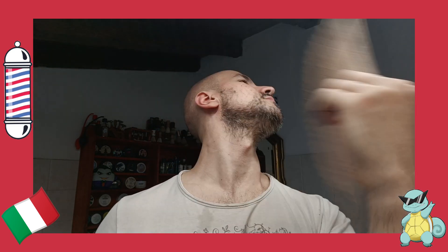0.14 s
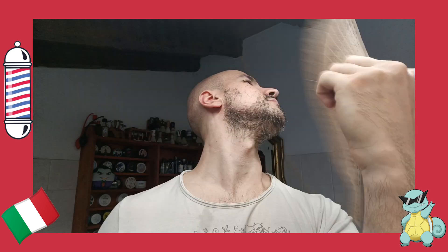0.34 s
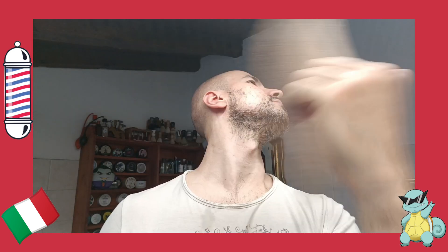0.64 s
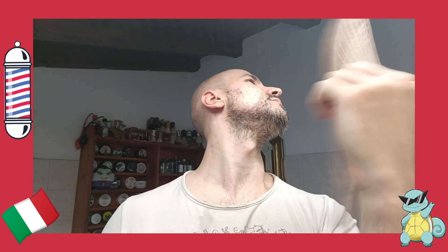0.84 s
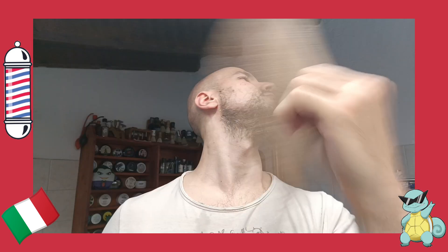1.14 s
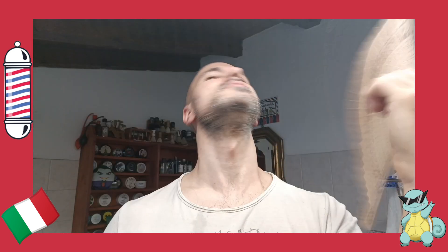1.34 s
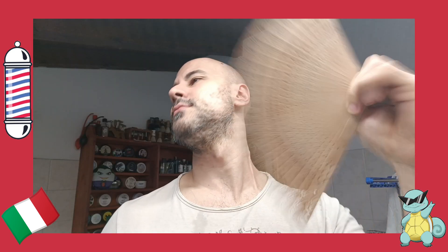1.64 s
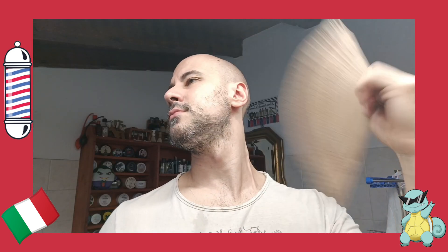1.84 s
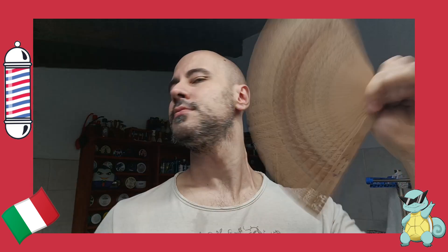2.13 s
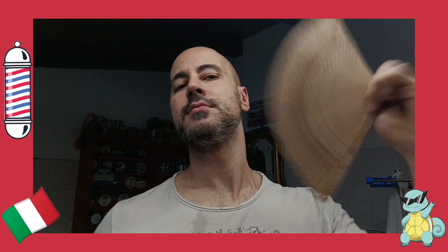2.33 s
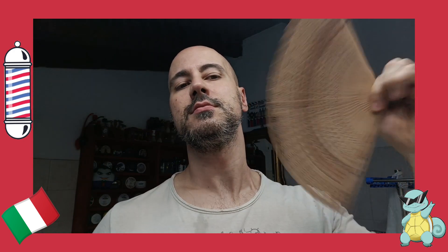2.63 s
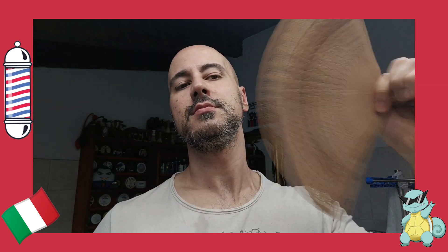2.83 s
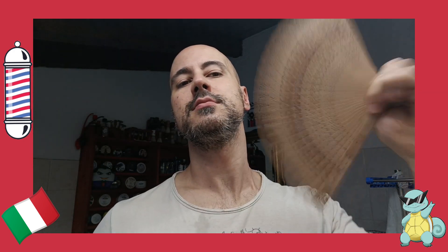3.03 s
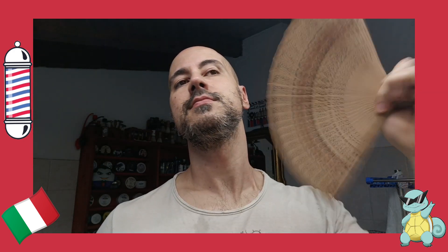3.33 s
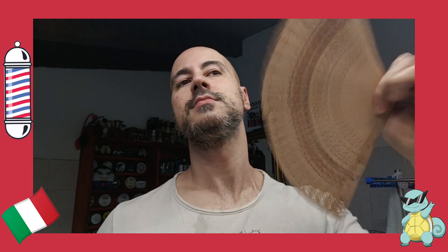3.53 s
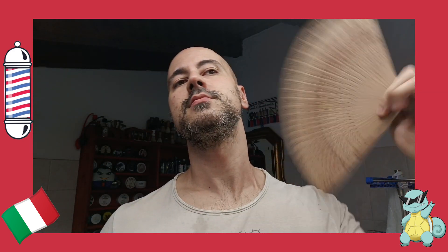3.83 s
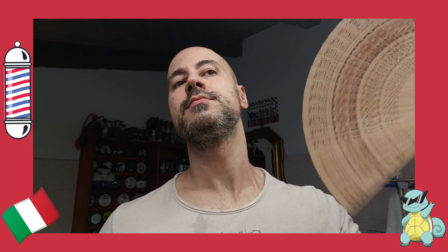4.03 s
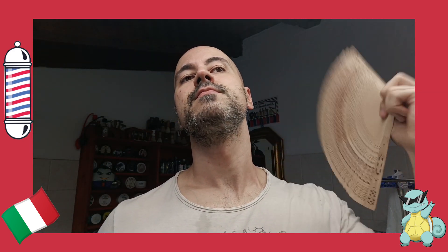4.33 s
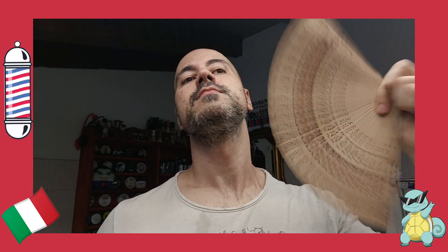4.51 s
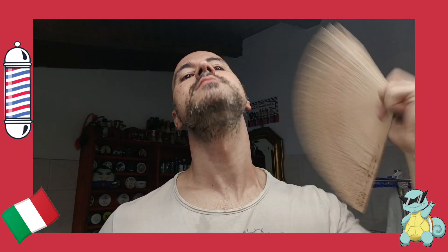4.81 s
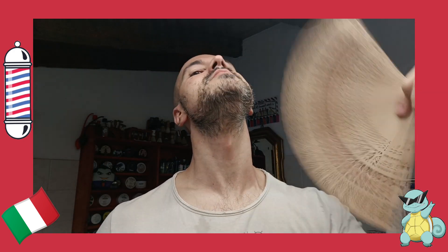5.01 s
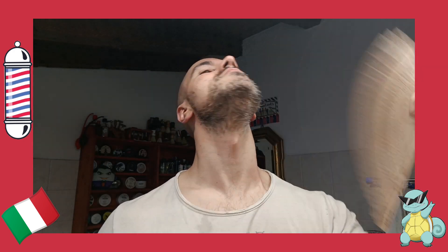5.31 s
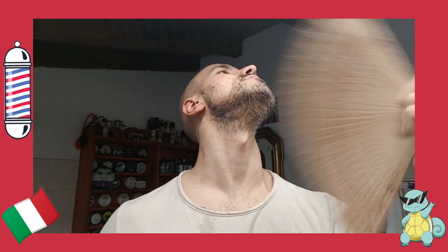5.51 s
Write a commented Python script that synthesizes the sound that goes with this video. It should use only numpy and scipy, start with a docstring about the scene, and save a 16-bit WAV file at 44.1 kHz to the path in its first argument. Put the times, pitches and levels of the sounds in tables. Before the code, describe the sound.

Close, dry wooden rattle-claps from a hand fan waved rapidly in a quiet room, with soft air thumps and one short rest.

```python
"""Wooden slats clap together about four times a second, then rustle on: a folding fan waved in a quiet room.
Softer rattles answer at each turn back; in one pause the slats creep and tick to rest.
The slat sounds are random knocks and rubbing ringing wood resonances, with a reverberant tail.
Strokes also thump and hum as moving air; a low tone swells once, over thin whistles, murmur and hiss."""
import sys
import numpy as np
from scipy import signal
from scipy.fft import rfft, irfft
from scipy.io import wavfile
from scipy.ndimage import uniform_filter1d

SR = 44100
rng = np.random.default_rng(int(sys.argv[2]) if len(sys.argv) > 2 else 0)


def put_to_file(sound):
    """Save the sound as 16-bit audio at rate SR, in the file named by the first command-line argument."""
    columns = np.atleast_2d(sound).T  # one column per channel
    safe = np.clip(columns, -1, 1)
    whole_steps = np.round(safe * 32767)
    wavfile.write(sys.argv[1], SR, whole_steps.astype(np.int16))


N = 249561
SIZE = 16384  # samples in one stroke's block of slat sound


def amp(db):
    """Turn decibels into an amplitude factor."""
    return 10 ** (np.asarray(db) / 20)


def evened(x):
    """Scale to an RMS of one."""
    return x / np.sqrt(np.mean(x ** 2) + 1e-20)


def read(points, hz):
    """Read a curve of (frequency, value) points along a logarithmic frequency axis."""
    f, value = np.transpose(points)
    return np.interp(np.log(hz + 1), np.log(f + 1), value)


def add(mix, s, sound):
    """Lay a sound into the mix at s seconds, cut at the end of the mix."""
    at = max(round(s * SR), 0)
    part = mix[:, at:at + sound.shape[-1]]
    part += sound[..., :part.shape[1]]


def fade(t, t60):
    """Exponential decay from time zero, falling 60 dB in t60 seconds; silent before."""
    return (t >= 0) * amp(-60 * np.maximum(t, 0) / t60)


def resonate(x, hz, width):
    """Two-pole resonance at hz with a bandwidth of width Hz."""
    r = np.exp(-np.pi * width / SR)
    return signal.lfilter([1 - r], [1, -2 * r * np.cos(2 * np.pi * hz / SR), r * r], x)


# A firm clap: level [dB], decay [s], rise [s]
FIRM_DB, FIRM_T60_S, FIRM_RISE_S = -17.5, 0.047, 0.011
# A weaker clap is looser: it lasts longer and builds more slowly (exponent per dB)
LOOSER_PER_DB, SLOWER_PER_DB = 0.0721, 0.02
# First touch just ahead of a firm clap: level [dB], and its dB change per dB of clap
AHEAD_DB, AHEAD_SHARE = -46.5, 0.64
# Rattle of the turn back: reference level [dB], decay [s], longer decay when weaker (exponent per dB)
BACK_DB, BACK_T60_S, BACK_LOOSER_PER_DB = -38.5, 0.12, 0.04
# After a clap under GENTLE_DB the slats part and start to fall quiet PARTED_S before the turn back
GENTLE_DB, PARTED_S = -22.5, 0.047
# Lesser knocks fall at random: rate [1/s], level against the rattle around them [dB], spread [dB]
STRAY_PER_S, STRAY_DB, STRAY_SPREAD_DB = 23, 2, 5.5
# Forward turns, contact strength before the wood colours it:
# (time [s], clap level [dB], rustle level [dB], air thump level [dB]); air() plays the thumps
FORWARD_TURNS = [(0.0591, -17.5, -38, -48), (0.3042, -20.5, -44.5, -52.5), (0.542, -17, -38.5, -46),
                 (0.7868, -17.5, -38.5, -44), (1.0277, -27, -54, -55), (1.2657, -19, -39.5, -51),
                 (1.5232, -15.5, -44, -49.5), (1.7576, -13, -46, -51), (1.979, -12, -40.5, -46),
                 (2.2107, -14.5, -44, -48), (2.4419, -16, -47, -52.5), (2.663, -15.5, -41, -48),
                 (2.8897, -17, -39, -49.5), (3.1133, -17, -42.5, -52.5), (3.3366, -17.5, -39, -51),
                 (3.566, -13, -39.5, -52.5), (3.797, -18.5, -44.5, -53.5), (4.551, -27.5, -42, -58),
                 (4.802, -29, -41.5, -56), (5.057, -23, -36, -55), (5.2906, -24.5, -39.5, -49.5),
                 (5.5354, -27, -38, -53)]
# Turns back: (time of the loudest rattle [s], level [dB], swell time constant [s])
TURNS_BACK = [(0.152, -38, 0.013), (0.418, -39.5, 0.038), (0.661, -40.5, .063), (0.902, -41, 0.022),
              (1.15, -45, .0014), (1.384, -46.5, 0.0056), (1.628, -39, 0.049), (1.863, -42.5, .034),
              (2.087, -37.5, 0.0074), (2.311, -36.5, .032), (2.537, -40, 0.04), (2.765, -39.5, 0.021),
              (2.988, -39.5, .016), (3.219, -37, 0.0087), (3.442, -38, .012), (3.666, -37.5, 0.0092),
              (3.869, -38, 0.0068), (4.668, -46, 0.0018), (4.913, -57.5, .0038), (5.164, -42.5, 0.0068),
              (5.402, -41, 0.0034), (5.648, -38.5, 0.0047)]
# The loudest single knocks of slat on slat: (time [s], level [dB])
SLAT_KNOCKS = [(0.069, -32), (0.1672, -25.5), (0.3092, -26), (0.545, -38), (0.6323, -40), (0.7905, -25),
               (0.9018, -43), (1.0376, -44), (1.2695, -24), (1.281, -34), (1.3864, -42), (1.5254, -29),
               (1.628, -38), (1.759, -26), (1.9857, -16), (2.0706, -33.5), (2.211, -20.5), (2.2142, -19.5),
               (2.4405, -21.5), (2.4458, -29), (2.6668, -34), (2.765, -33), (2.895, -44), (2.995, -31),
               (3.113, -25.5), (3.338, -20.5), (3.3423, -17), (3.4435, -38), (3.563, -27.5), (3.5673, -39),
               (3.666, -31.5), (3.7997, -36), (3.8048, -32), (3.868, -35.5), (3.8833, -42), (4.555, -38),
               (4.5625, -34), (4.6688, -41), (4.8122, -33), (5.063, -30), (5.073, -20), (5.293, -32),
               (5.3081, -18.5), (5.5506, -23)]


def slats():
    """Claps with their rustle and knocks, and the swelling rattle of the turn back."""
    mix = np.zeros((2, N))
    lead, knock_t60 = 0.05, 0.008  # s
    t = np.arange(SIZE) / SR - lead  # zero at the clap
    for (s, db, rustle_db, _), (back, back_db, swell) in zip(FORWARD_TURNS, TURNS_BACK):
        turn = t - (back - s)  # zero at the turn back
        t60 = FIRM_T60_S * np.exp(LOOSER_PER_DB * (FIRM_DB - db))
        back_t60 = BACK_T60_S * np.exp(BACK_LOOSER_PER_DB * (BACK_DB - back_db))
        slower = np.exp(SLOWER_PER_DB * (FIRM_DB - db))

        rise = np.clip(0.23 + t / (FIRM_RISE_S * slower), 0, 1)
        clap = amp(db) * fade(t, t60) * rise
        # the first slats touch just ahead of the clap
        ahead = amp(AHEAD_DB + AHEAD_SHARE * (db - FIRM_DB))
        closing = (t < 0) * ahead * np.exp(np.minimum(t, 0) / (0.0056 * slower))
        parted = 1
        if db < GENTLE_DB:
            parted = np.maximum(fade(turn + PARTED_S, 0.026), turn + PARTED_S < 0)

        # rustle and swell start at the clap and die after the turn back
        ends = fade(turn, back_t60) + (turn < 0) * (t > 0)
        rustle = amp(rustle_db) * fade(t, 0.5) * parted
        swelling = amp(back_db) * np.exp(np.minimum(turn, 0) / swell)
        settling = amp(-62.5) * fade(t, 1.17)  # the slats never quite rest between strokes
        rattle_power = (rustle ** 2 + swelling ** 2) * ends ** 2
        level = np.sqrt((clap * parted) ** 2 + closing ** 2 + rattle_power + settling ** 2)

        knocks = sum(amp(hit_db) * fade(t - (at - s), knock_t60)
                     for at, hit_db in SLAT_KNOCKS if -0.02 < at - s < 0.19)
        chance, size = rng.random(SIZE), rng.standard_normal(SIZE)
        stray = level * amp(STRAY_DB + STRAY_SPREAD_DB * size) * (chance < STRAY_PER_S / SR)
        knocks = knocks + signal.lfilter([1], [1, -amp(-60 / (knock_t60 * SR))], stray)

        # the clap moves whole slats, the later rattle only their tips
        weight = np.exp(-(t / 0.062) ** 2)
        contact = chatter(level) + knocks
        add(mix, s - lead, wood(s, contact, weight, *changes(s)[1:4]))
    return mix


def chatter(level, spread_db=2.0, per_s=350, contact_s=0.00081, rub=0.55):
    """Strength of contact in three groups of slats: many random small knocks over a steady rubbing."""
    size = amp(spread_db * np.minimum(rng.exponential(1, (3, SIZE)), 3))
    hits = size * (rng.random((3, SIZE)) < per_s / SR)
    return level * evened(rub + signal.lfilter([1], [1, -np.exp(-1 / (contact_s * SR))], hits))


# Overall colour of the slats: (frequency [Hz], density [dB per Hz])
SLAT_COLOUR = [(180, -43), (300, -14), (420, -26), (504, -18.5), (1250, -11), (1430, -7), (1800, -6.5),
               (2400, 0.5), (11000, -2.5), (15400, -5.5), (16500, -18)]
# Ringing of the slats before random bending: (frequency [Hz], width [Hz], level against the plain knock [dB])
SLAT_RINGS = [(964, 49, 3), (1202, 97, -1), (1396, 67, 8.5), (2280, 110, -1.5), (3055, 200, -6),
              (4000, 144, 4.5), (4800, 285, 6), (5230, 410, -3), (6200, 340, 1), (7370, 230, -4.5),
              (8450, 160, -7.5), (10720, 440, 0)]
# The bass leans left, the top is centred: (frequency [Hz], left minus right [dB])
STEREO_LEAN = [(500, 2.5), (2000, 1.5), (12000, 0)]


def wood(s, contact, weight, pan_db, body_db, bright_db, thin_db=-0.5, wide_ms=0.064):
    """Rough contacts ring the slats, heavy ones with more body; the three groups reach the two ports apart."""
    hz = np.fft.rfftfreq(SIZE, 1 / SR)
    rough = contact * rng.standard_normal((3, SIZE))
    low = 1 / (1 + (hz / 1900) ** 4)  # the range that carries the body
    heavy = rfft(rough * weight) * amp(body_db * low)
    light = rfft(rough * (1 - weight)) * amp(thin_db * low)
    drive = heavy + light
    f, width, db = np.transpose(SLAT_RINGS)[:, :, None]
    colour = amp(read(SLAT_COLOUR, hz) + bright_db / (1 + ((hz - 4700) / 1000) ** 2))
    out = np.zeros((2, len(hz)), complex)
    for k, place in enumerate([-1, 0, 1]):
        bent = f * (1 + 0.047 * rng.standard_normal(f.shape))  # other slats, bent otherwise
        struck = amp(db + 2 * rng.standard_normal(f.shape))
        thick = amp(1.33 * place * np.log2((hz + 300) / 4500))  # one edge knocks duller, the other brighter
        ring = colour * thick * (1 + (struck / (1 + 2j * (hz - bent) / width)).sum(0))
        ring = ring / np.sqrt(3 * np.mean(abs(ring) ** 2))
        late = np.exp(-2j * np.pi * hz * (changes(s)[0] + place * wide_ms) / 1000)  # delay of the left port
        lean_db = pan_db / 2 + 0.91 * place + read(STEREO_LEAN, hz) / 2
        sides = amp(np.array([[1], [-1]]) * lean_db)
        out += sides * np.array([late, late ** 0]) * drive[k] * ring
    return irfft(out, SIZE)


# Changes over time, joined by straight lines: (time [s], left port lateness [ms], left minus right [dB],
# extra slat body [dB], extra slat brightness [dB], air hum level [dB]); air() plays the hum
CHANGES = [(0, 0.054, 0, 6.5, -5.5, -57.5), (.35, 0.041, 2, 3, -5, -67), (.9, -0.033, 1.4, 2.5, -7, -75),
           (1.27, -0.058, 1.5, 4.5, -3.5, -62), (1.55, 0.13, -1, 4, -3, -51.5),
           (1.85, 0.15, -1, -0.2, -4, -57), (2.7, 0.12, -2, -1.5, -4.5, -50.5),
           (3.0, 0.16, -2, -1, -4, -57), (3.6, .15, -1.5, 1, -2.5, -53.5), (4.55, .16, -1, 3, -1.5, -61.5),
           (4.8, .16, -1.5, 5, -3, -74), (5.06, 0.15, -1, 3, -3, -62.5), (5.66, 0.16, -1, 7.5, -3.5, -74)]


def changes(s):
    """Left port lateness, left-right balance, slat body and brightness, and air hum level at time s."""
    times, *columns = np.transpose(CHANGES)
    return [np.interp(s, times, column) for column in columns]


TICK_T60_S = 0.02
# Single slats tick while the hand rests: (time [s], level [dB]), before the wood colours them
REST_TICKS = [(4.012, -50), (4.065, -53), (4.142, -56), (4.339, -59.5), (4.457, -67)]


def resting():
    """While the hand pauses the slats creep to rest with a thinning rustle and single ticks."""
    mix, start = np.zeros((2, N)), 3.92
    t = np.arange(SIZE + SIZE) / SR
    creep = amp(-55.0) * fade(t, 0.84) * np.clip(t / 0.015, 0, 1)
    ticks = sum(amp(db) * fade(t - (s - start), TICK_T60_S) for s, db in REST_TICKS)
    for half in (slice(0, SIZE), slice(SIZE, None)):
        s = start + t[half][0]
        contact = chatter(creep[half], per_s=140) + ticks[half]
        add(mix, s, wood(s, contact, weight=0, pan_db=-0.86, body_db=0, bright_db=0.84))
    return mix


def air():
    """Each stroke sends a soft, turbulent pressure thump, and a puff that excites two low resonances."""
    mix, t = np.zeros((2, N)), np.arange(SR // 4) / SR
    for s, *_, thump_db in FORWARD_TURNS:
        puff = rng.standard_normal((5, len(t)))
        u = (t - 0.042) * 85  # cycles of an 85 Hz pulse
        push = np.exp(-(u / 0.59) ** 2) * np.cos(2 * np.pi * u + rng.uniform(2.5, 3.8))
        # turbulence: mostly shared, partly separate left and right
        swirl = resonate(resonate(puff[2] + 0.23 * puff[3:], 95, 110), 170, 120)
        swirl = evened(swirl) * np.exp(-((t - 0.05) / 0.04) ** 2)
        add(mix, s, amp(thump_db) * (push + 0.36 * swirl) * amp([[0.8], [-0.8]]))
        hum = evened(resonate(puff[0], 323.7, 26.0) + 0.26 * resonate(puff[1], 265, 22.0))
        hum = hum * np.exp(-((t - 0.06) / 0.044) ** 2)
        add(mix, s, amp(changes(s)[-1]) * hum * amp([[-1.7], [1.7]]))
    return mix


# Decay of the reverberant tail: (frequency [Hz], t60 [s])
ROOM_DECAY = [(300, 0.62), (1500, 0.2), (10000, 0.14)]


def room(x):
    """Sparse taps of random sign, each band dying at its own speed."""
    taps = np.zeros((2, SR // 2))
    at = np.arange(200, SR // 2 - 20, 20)
    at = at + rng.integers(0, 20, (2, len(at)))
    np.put_along_axis(taps, at, rng.choice([-1., 1.], at.shape), 1)
    hz, t, z = signal.stft(taps, SR, nperseg=256)
    decay = amp(-60 * t / read(ROOM_DECAY, hz)[:, None])
    tail = signal.istft(z * decay, SR, nperseg=256)[1]
    return signal.fftconvolve(x, tail / np.linalg.norm(tail[0]), axes=1)[:, :N]


TONE_S, TONE_TOP_S, TONE_END_S = 4.91, 5.026, 5.1
TONE_HZ, TONE_RISE_HZ_PER_S = 251, 35
TONE_DB, SWELL_DB_PER_S, SINK_DB_PER_S = -51.5, 123, 110


def tone():
    """A short low pure tone that creeps upward, swells and sinks."""
    t = np.arange(TONE_S, TONE_END_S, 1 / SR)
    mix = np.zeros((2, N))
    hz = TONE_HZ + TONE_RISE_HZ_PER_S * (t - TONE_S)
    wave = np.sqrt(2) * np.sin(2 * np.pi * np.cumsum(hz) / SR)
    swell_db = SWELL_DB_PER_S * np.maximum(TONE_TOP_S - t, 0)
    sink_db = SINK_DB_PER_S * np.maximum(t - TONE_TOP_S, 0)
    wave = wave * amp(TONE_DB - swell_db - sink_db) * signal.windows.tukey(len(t), 0.25)
    add(mix, TONE_S, wave * amp([[-1.5], [1.5]]))
    return mix


# Faint thin whistles: (time [s], length [s], frequency [Hz], level [dB])
FAINT_WHISTLES = [(0, 0.25, 2290, -64), (4.36, 0.063, 10300, -81)]


def whistles():
    """Thin, slightly fuzzy tones at the edge of hearing, from noise through a narrow resonance."""
    mix = np.zeros((2, N))
    for s, length, hz, db in FAINT_WHISTLES:
        noise = rng.standard_normal(round(length * SR) + 2000)
        fuzz = resonate(noise, hz, 40)[2000:]  # skip the build-up
        add(mix, s, amp(db) * evened(fuzz) * signal.windows.tukey(len(fuzz), 0.3))
    return mix


FLOOR_DB = -67.5  # RMS level
# Colour of the murmur and hiss: (frequency [Hz], density [dB per Hz])
FLOOR_COLOUR = [(25, -34.5), (60, -15), (95, -6.5), (160, -8.5), (205, -17), (245, -5.5), (320, -8.5),
                (400, -17), (720, -23), (830, -15.5), (1500, -23), (7000, -31.5), (10100, -31.5),
                (16500, -45)]
# Left-right likeness of the murmur and hiss: (frequency [Hz], correlation [0 to 1])
FLOOR_LIKENESS = [(30, 0.88), (300, 0.8), (1000, 0.12), (4000, 0.1)]


def floor():
    """Low murmur of the house and hiss: shaped stereo noise in drifting patches."""
    frames, hz = N // 1024 + 5, np.fft.rfftfreq(4096, 1 / SR)
    a, b, c, d, patches = rng.standard_normal((frames, len(hz), 5)).T
    patches = evened(uniform_filter1d(patches, size=30, axis=0))  # joined across frequency
    same = np.clip(read(FLOOR_LIKENESS, hz), -1, 1)[:, None]
    left = a + 1j * b
    right = same * left + np.sqrt(1 - same ** 2) * (c + 1j * d)
    z = np.array([left, right]) * amp(read(FLOOR_COLOUR, hz)[:, None] + 2 * patches)
    return amp(FLOOR_DB) * evened(signal.istft(z, nperseg=4096, noverlap=3072)[1][:, :N])


def scene():
    """The fan and its reverberant tail, with moving air, tone, whistles and the quiet background."""
    fan = slats() + resting()
    return fan + amp(-4.5) * room(fan) + air() + tone() + whistles() + floor()


EDGE_HZ = 16050


def record(dry):
    """The capsules lose the deepest bass; then a low-pass limits the band."""
    thin = signal.lfilter(*signal.butter(2, 45, "high", fs=SR), dry)
    lowpass = signal.firwin(255, EDGE_HZ, window=("kaiser", 9), fs=SR)
    return signal.oaconvolve(thin, lowpass[None], "same")


dry = scene()
out = record(dry)
put_to_file(out)
```